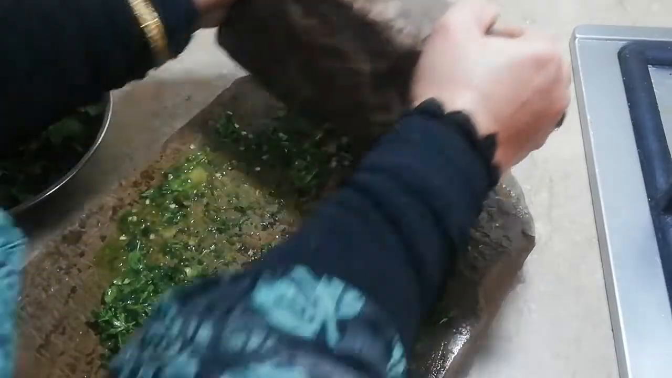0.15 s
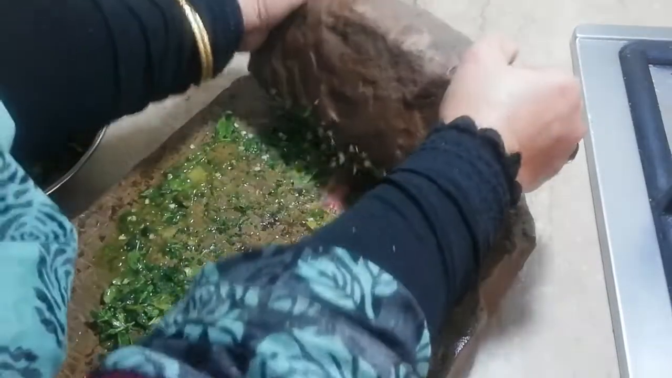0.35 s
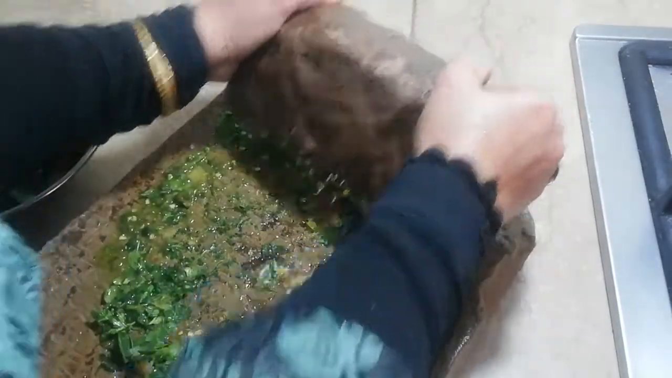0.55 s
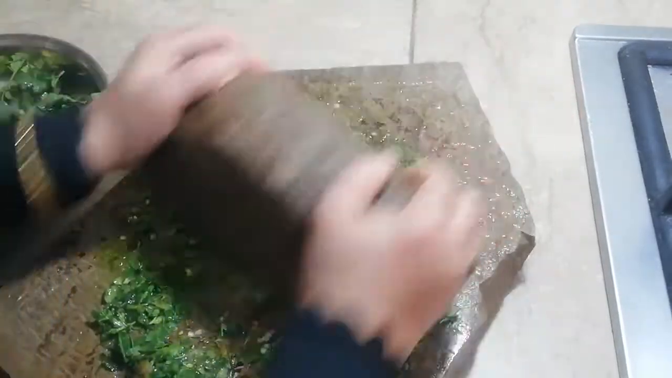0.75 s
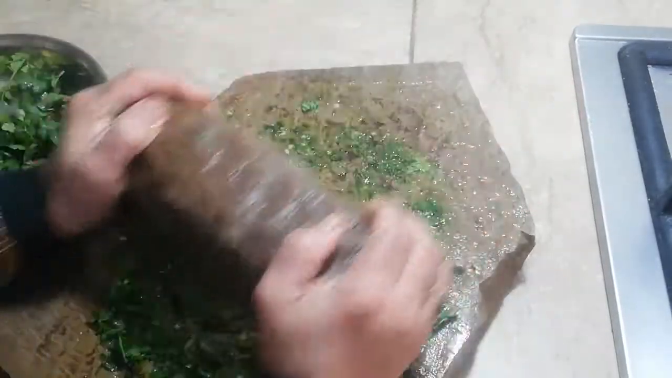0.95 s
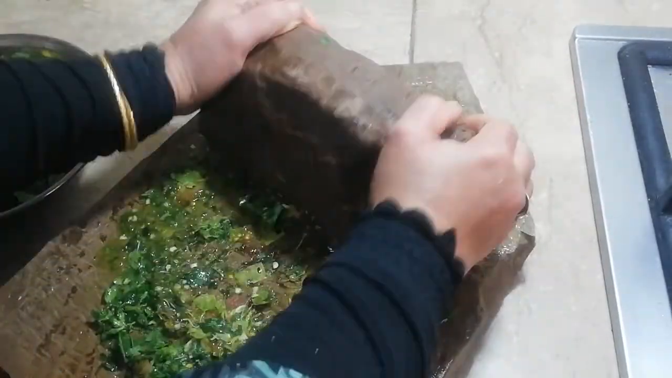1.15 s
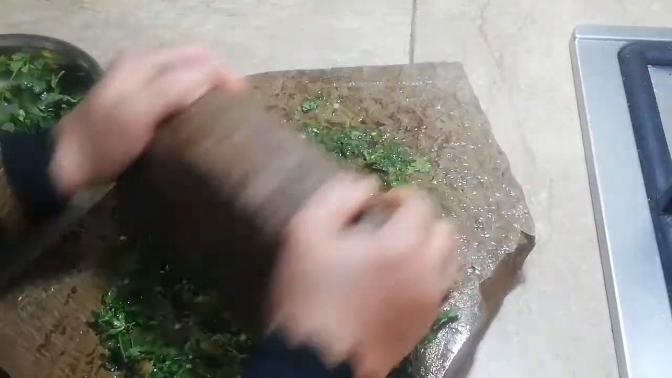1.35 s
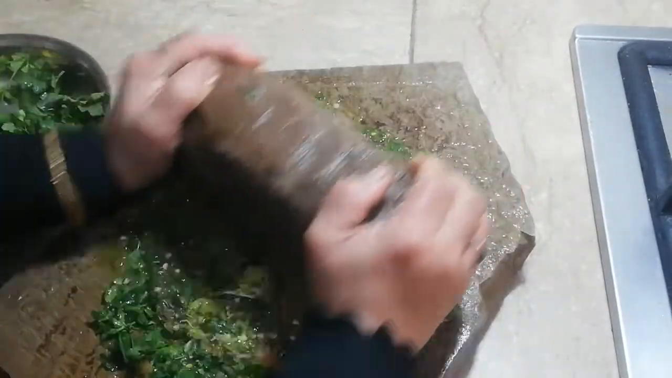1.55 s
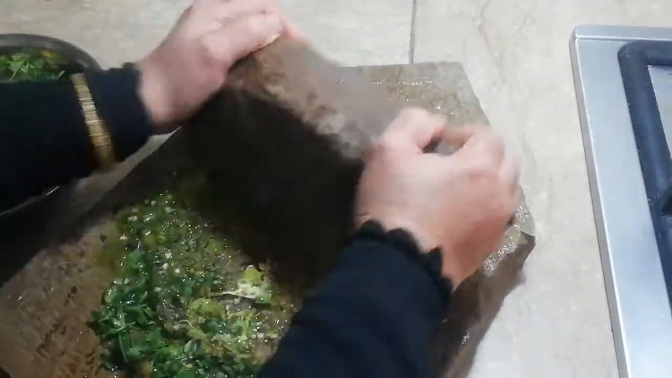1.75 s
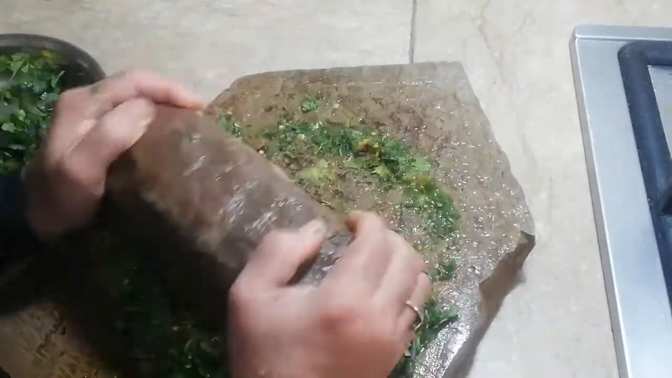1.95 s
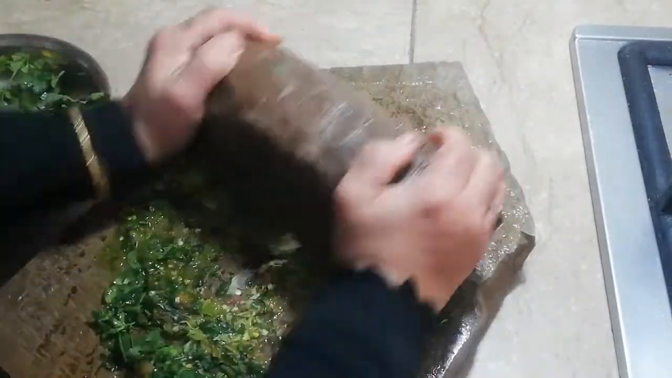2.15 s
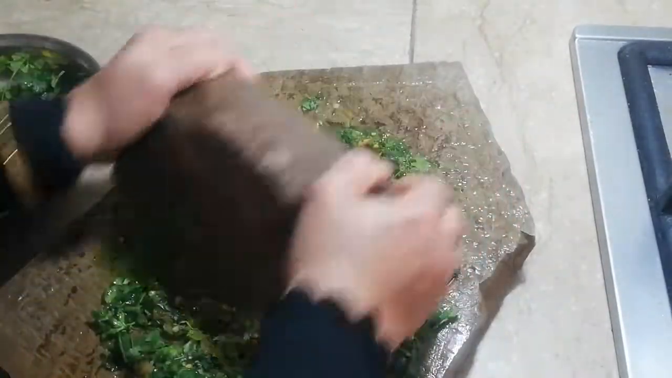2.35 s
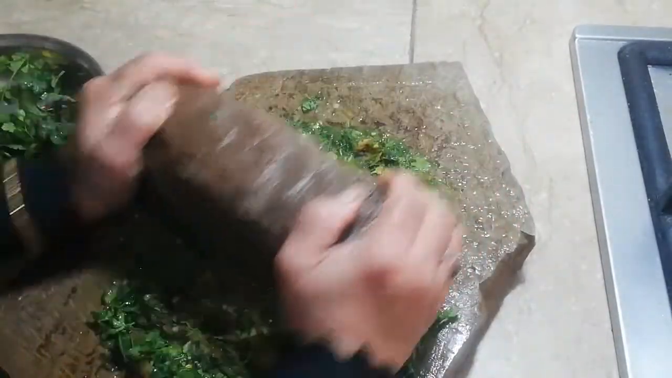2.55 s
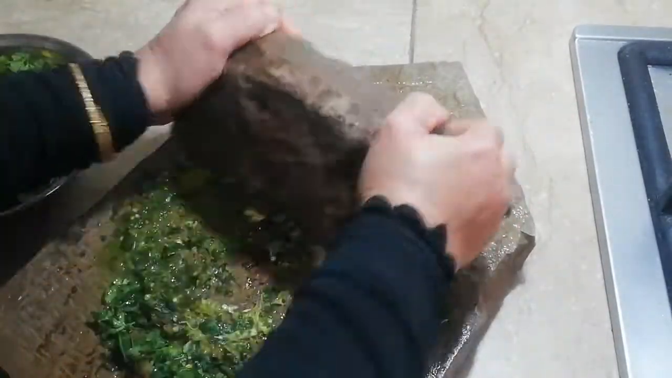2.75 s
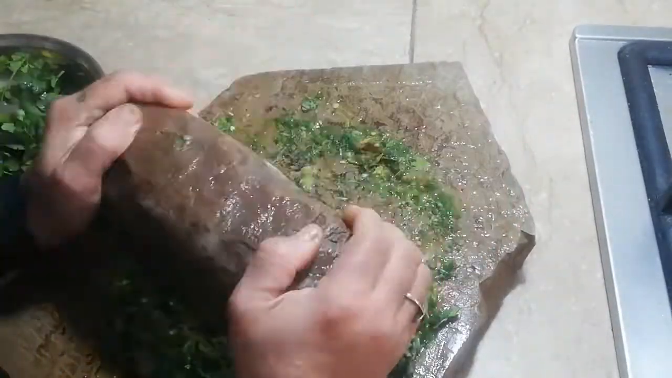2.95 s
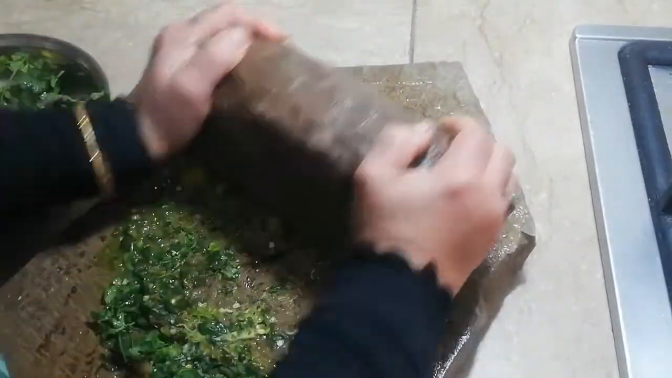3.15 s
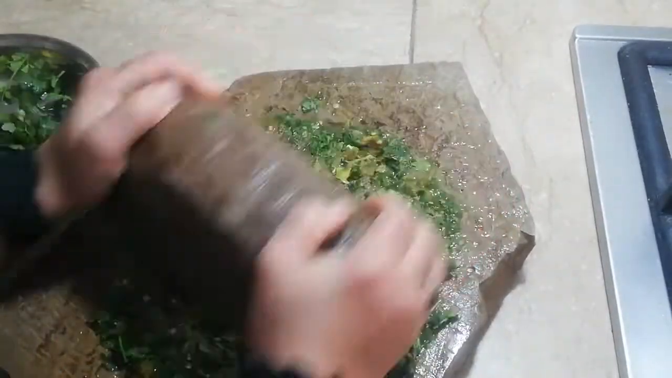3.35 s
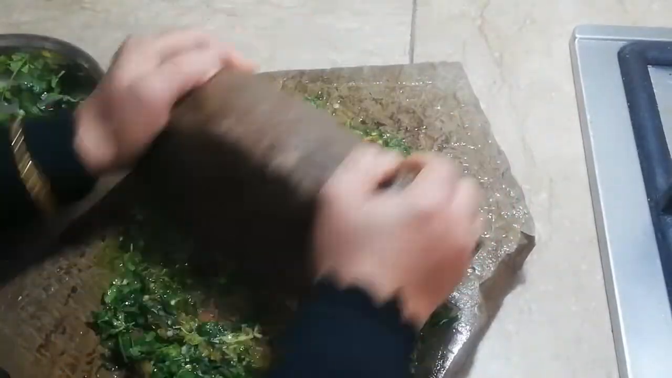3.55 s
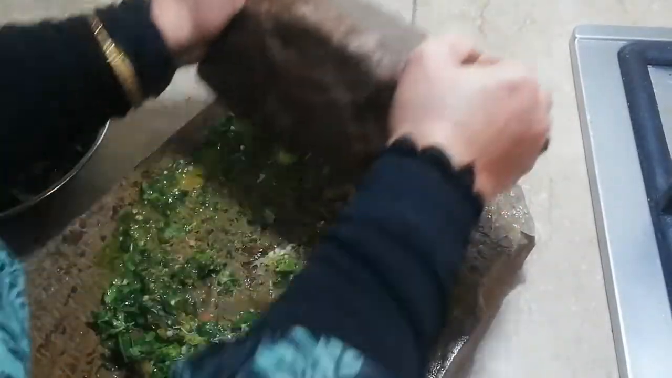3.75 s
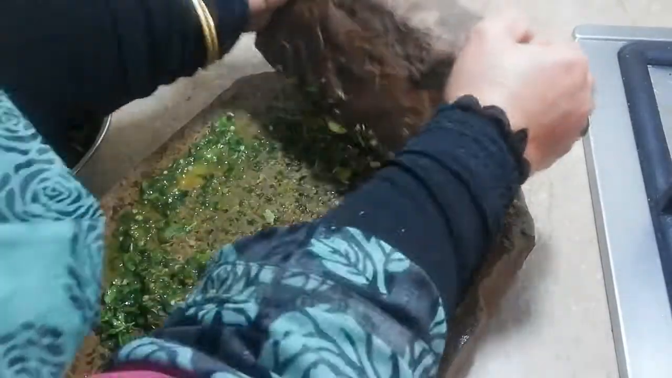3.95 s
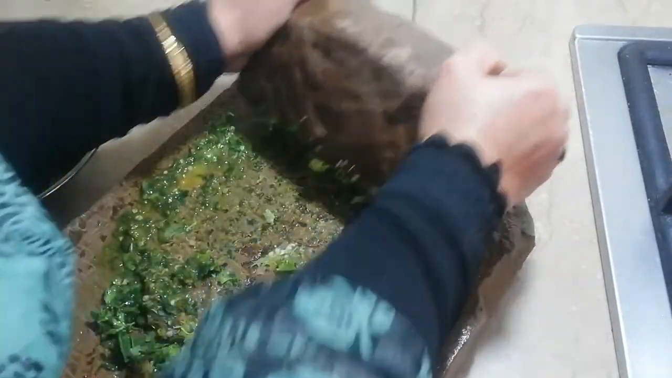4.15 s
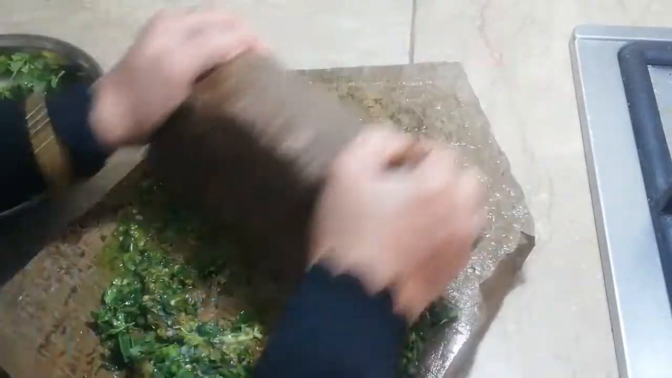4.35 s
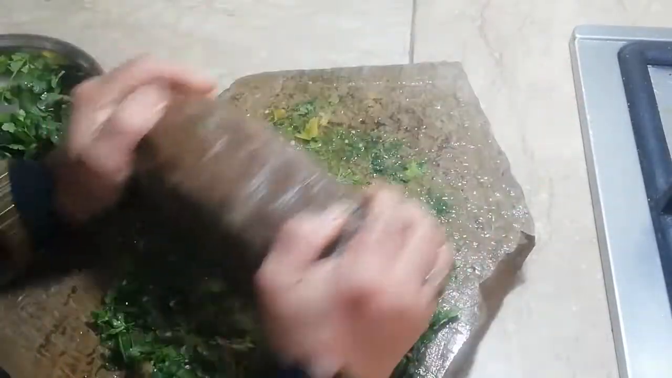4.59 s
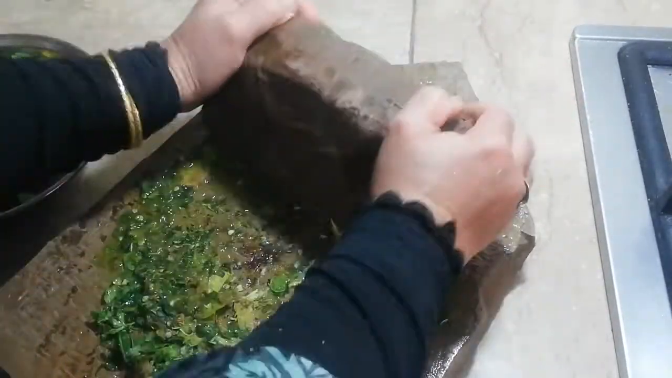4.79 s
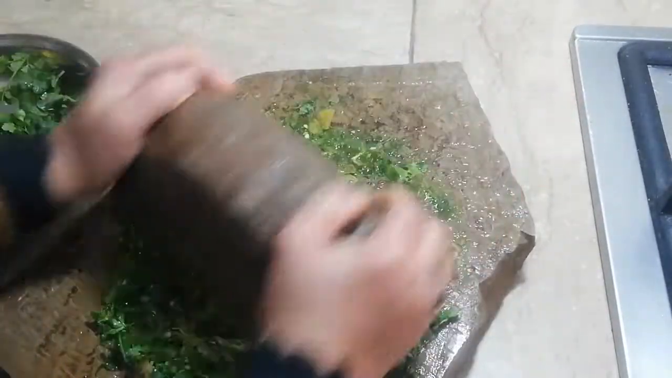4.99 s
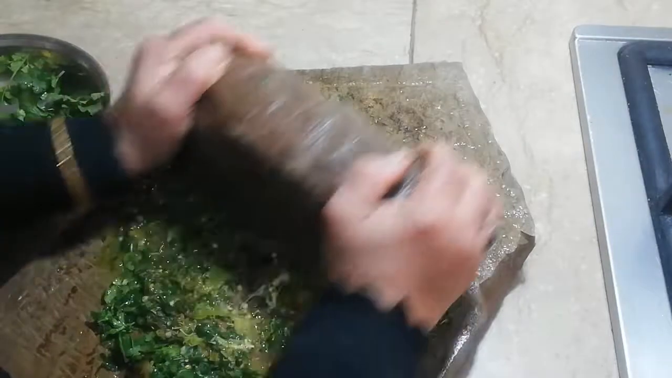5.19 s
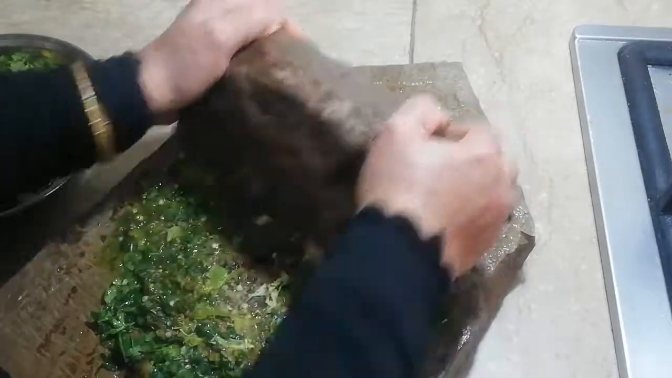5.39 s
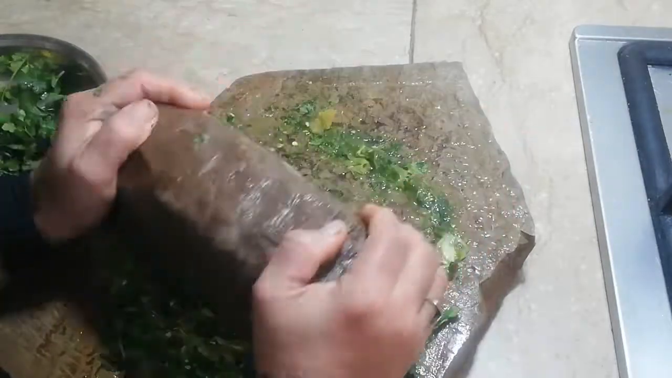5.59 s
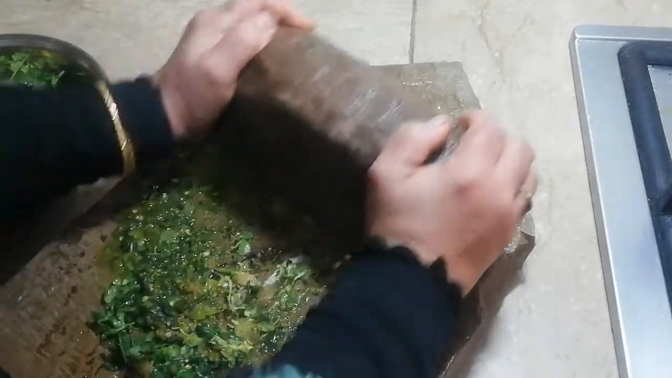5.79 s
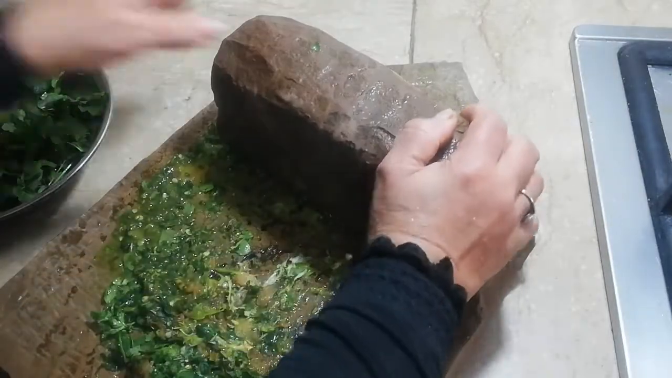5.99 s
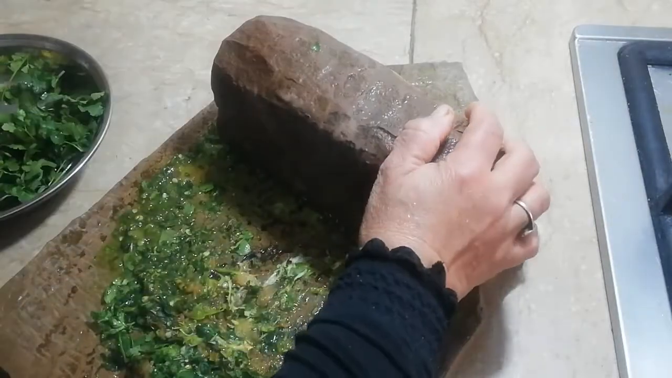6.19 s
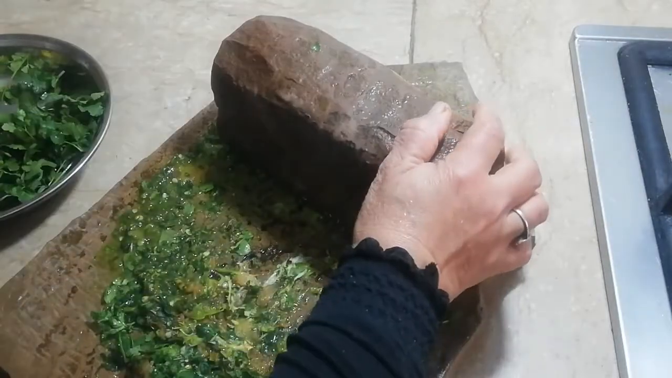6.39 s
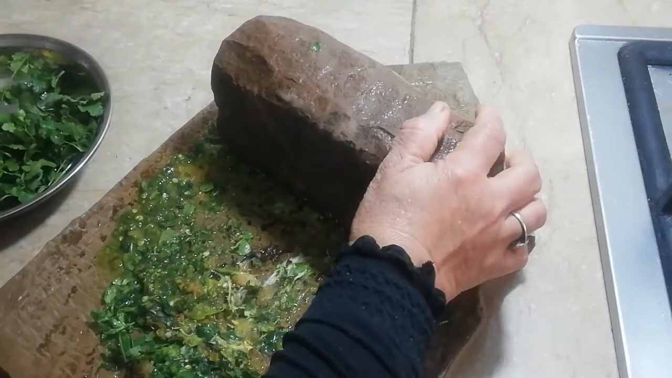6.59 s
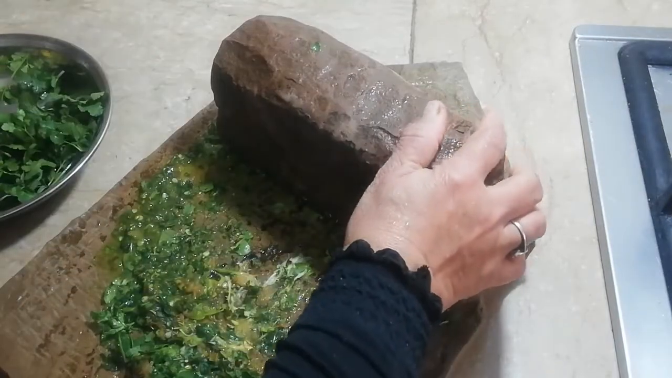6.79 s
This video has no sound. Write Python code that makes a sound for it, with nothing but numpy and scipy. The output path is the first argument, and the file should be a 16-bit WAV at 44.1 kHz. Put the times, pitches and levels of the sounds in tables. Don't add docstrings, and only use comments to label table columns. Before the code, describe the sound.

Rough stone rubs to and fro on a grinding slab, knocking and crushing wet greens, with two hard drops and a faint fridge hum.

```python
import sys
import numpy as np
from scipy import signal
from scipy.fft import rfft, irfft, next_fast_len
from scipy.io import wavfile

SR = 44100
rng = np.random.default_rng(int(sys.argv[2]) if len(sys.argv) > 2 else 0)


def master_out(mix):
    frames = np.transpose(np.atleast_2d(mix))
    ceiling = np.clip(frames, -1, 1)
    pcm = np.round(ceiling * 32767).astype(np.int16)
    wavfile.write(sys.argv[1], SR, pcm)


def makeup_ratio(level_db):
    decades = np.asarray(level_db, float) / 20
    return 10 ** decades


N = 301203
SIZE = next_fast_len(N + SR)
FREQ = np.fft.rfftfreq(SIZE, 1 / SR)
FFT_SIZE = 2 * (len(FREQ) - 1)
TIME = np.arange(N) / SR
STEP = TIME[::64]


def level(x, rms_db):
    return x * makeup_ratio(rms_db) / np.sqrt(np.mean(x ** 2))


def above(x, hz):
    return signal.sosfilt(signal.butter(3, hz, "high", fs=SR, output="sos"), x)


def curve(table):
    hz, db = np.transpose(table)
    return makeup_ratio(np.interp(np.log(FREQ + 1), np.log(hz), db))


def shape(x, response):
    return irfft(rfft(x, FFT_SIZE) * response, FFT_SIZE)[..., :N]


def fade(x, decay_s):
    return signal.lfilter([1], [1, -np.exp(-1 / (decay_s * SR))], x)


def ring(x, hz, width_hz):
    radius = np.exp(-np.pi * width_hz / SR)
    turn = 2 * np.pi * hz / SR
    return signal.lfilter([np.sin(turn)], [1, -2 * radius * np.cos(turn), radius ** 2], x)


def body(x, modes):
    out = 0
    for k, (hz, width_hz, db) in enumerate(modes):
        out = out + (-1) ** k * makeup_ratio(db) * width_hz * ring(x, hz, width_hz)
    return out


def unit(modes):
    return np.abs(body(np.eye(1, 4000)[0], modes)).max()


def signs(count):
    return np.sign(rng.standard_normal((count, N)))


def grit(per_s, scatter_db):
    chance, size = rng.random((2, N))
    click = makeup_ratio(scatter_db * np.minimum(-np.log(1 - size), 3.2))
    return (chance < per_s / SR) * click


def blows(times_s, dbs, push_s):
    force = np.zeros(N)
    force[(np.asarray(times_s) * SR).astype(int)] = makeup_ratio(dbs)
    push = np.hanning(max(int(push_s * SR), 3) + 2)
    return np.convolve(force, push / push.sum())[:N]


def total_db(dbs):
    return 10 * np.log10(np.sum(makeup_ratio(dbs) ** 2, axis=0) + 1e-14)


def smooth(dbs):
    return [np.interp(TIME, STEP, db) for db in dbs]


# [fullest t/s, swell/s, counter rumble/dB, stone chatter/dB, counter sway/dB]
PUSHES = [
    (1.27, 0.011, -22, -33.5, -34),
    (1.87, 0.051, -17.5, -28, -38),
    (2.38, 0.057, -17.5, -30, -36),
    (2.85, 0.061, -19.5, -27.5, -35.5),
    (3.35, 0.027, -18, -24.5, -33),
    (4.915, 0.023, -25, -33, -36),
    (4.98, 0.023, -25.5, -35.5, -30.5),
    (5.44, 0.03, -19, -23, -34),
    (5.52, 0.077, -20, -40, -42),
]
# [fullest t/s, swell/s, counter rumble/dB, stone chatter/dB, counter sway/dB]
PULLS = [(0.01, 0.022, -47.5, -54.5, -49.5), (1.09, 0.029, -30.5, -39, -28), (1.46, 0.069, -51, -65, -40),
         (1.62, 0.064, -32, -38, -31.5), (2.18, 0.14, -34.5, -39, -40), (2.63, .06, -25, -34.5, -32),
         (3.02, 0.024, -28.5, -41, -50), (3.14, 0.091, -28.5, -37, -34.5), (3.61, 0.024, -25, -36, -40),
         (4.05, 0.42, -58.5, -57, -49.5), (4.715, 0.03, -32.5, -42, -42.5), (5.23, 0.038, -31, -36, -33.5),
         (5.31, 0.023, -26, -50, -46), (5.76, 0.046, -29.5, -41.5, -36), (5.84, 0.056, -46.5, -54, -56),
         (6.83, 0.04, -61.5, -49.5, -63)]
# [fullest t/s, swell/s, counter rumble/dB, stone chatter/dB, counter sway/dB]
ROCKING = [
    (0.43, 0.0087, -36, -49, -29),
    (0.54, 0.083, -22.5, -48, -42),
    (0.7, 0.24, -32, -38, -38),
    (4.12, 0.0093, -16, -23, -34),
    (4.31, 0.027, -28, -34, -45),
    (4.45, 0.12, -35, -41, -36.5),
]


def strokes():
    swell_db = 11
    groups = [(PUSHES, (135, 120, 122)), (PULLS, (129.5, 138.5, 124)), (ROCKING, (110, 128.5, 125))]
    out = []
    for table, fall_db_s in groups:
        for s, swell_s, *full_db in table:
            early = np.maximum(s - STEP, 0) / swell_s
            late_s = np.maximum(STEP - s, 0)
            fall_db = np.array(fall_db_s)[:, None] * late_s
            out.append(np.array(full_db)[:, None] - swell_db * early ** 2 - fall_db)
    return smooth(total_db(np.array(out)))


# [t/s, peak level/dB,
# counter share/dB]
KNOCKS = [(0.417, -0.5, -19), (0.444, -12, -6), (0.527, -18, -12), (0.587, -21, -5), (0.688, -25.5, 0.5),
          (1.076, -26, -0.5), (1.265, -31.5, 11), (1.614, -26.5, 2.5), (1.814, -30, 8.5),
          (1.832, -16.5, -2.5), (1.856, -15, -10), (2.329, -24, 0), (2.346, -21, -7), (2.362, -11, -10),
          (2.388, -12.5, -19), (2.489, -22.5, -2.5), (2.172, -34.5, 12), (2.792, -24, -24),
          (2.845, -9.5, -5), (3.316, -31, 3), (3.346, -15, -16), (3.379, -13.5, -7), (3.606, -15.5, -3),
          (4.108, -8.5, -22), (4.137, -20, -4), (4.192, -19.5, 0), (4.986, -27, 5.5), (5.423, -23, 1),
          (5.468, -7.5, -6.5), (5.706, -29.5, 3)]
# [f/Hz, width/Hz, level/dB]
COUNTER = [(137, 24, -6.5), (167.7, 21, -1), (261.3, 21.7, -4), (298, 33, -3), (318.5, 42.6, -4.5),
           (376, 15.6, -9.5), (439.8, 32, -14), (600, 190, -20.5)]
# [f/Hz, width/Hz, level/dB]
SWAY = [(80, 4.9, -25.5), (107, 12, -1)]
# [f/Hz, width/Hz, level/dB]
SLAB = [(570, 75, -2.5), (650, 73, 2), (759, 130, -0.5), (853, 103, 5.5), (993, 44, 4), (1109, 140, 2.5),
        (1295, 114, 2), (1420, 110, -3), (1534, 340, -8), (1680, 270, -8), (2060, 55, 0.5),
        (2600, 100, -28), (3260, 370, -14.5)]


def stone(rumble_db, chatter_db, sway_db):
    bump_sign, chatter_sign, rattle_sign = signs(3)
    bumps = bump_sign * grit(420, 1.75)
    rumble = level(body(bumps, COUNTER), 0) * makeup_ratio(rumble_db - 4.5)
    sway = level(body(bumps, SWAY), 0) * makeup_ratio(sway_db)
    chatter = level(body(chatter_sign * grit(520, 1.5), SLAB), 0) * makeup_ratio(chatter_db - 8.5)
    s, db, share_db = np.transpose(KNOCKS)
    rattle = fade(blows(s + 0.0017, db - 14, 0.0001), 0.0068) * rattle_sign * grit(350, 6)
    rattle = fade(rattle, 0.00005) / 2.7
    knocks = body(blows(s, db - 0.5, 0.00052) + rattle, SLAB) / unit(SLAB)
    both = COUNTER + SWAY
    thuds = body(blows(s, db + share_db, 0.0008), both) / unit(both)
    return above(above(rumble + sway + thuds, 70), 80), chatter + knocks


# [t/s, peak level/dB]
DROPS = [
    (0.414, -6),
    (4.107, -8.5),
]
# [f/Hz, level/dB, decay scale/s; each mode falls 60 dB in about 0.27 of it]
DROP_RING = [(754.6, -8, 0.19), (892, 1.5, 0.13), (960, 1, 0.058), (1072, 5.5, 0.074), (1090, -12, 0.097),
             (1174, -23.5, 0.1), (1430, 7, .07), (1720, -18.5, 0.074)]
# [f/Hz, width/Hz, level/dB]
STEEL = [(2925, 9, 6), (3300, 40, -7.5), (4062, 14, 7), (4130, 16, 4), (4600, 29, -14), (6600, 44, -5.5),
         (7240, 25, -11.5), (8200, 27, -10), (8830, 41, -0.5), (9442, 28, -9.5), (10800, 25, -13),
         (11500, 25, -13), (12400, 35, -23), (6000, 5200, 12)]


def drops():
    s, db = np.transpose(DROPS)
    hit = 0.35 * blows(s + 0.0016, db, 0.0006)
    hit = hit + blows(s + 0.0032, db + 2, 0.0007) + 0.2 * blows(s + 0.0072, db, 0.0007)
    crack = makeup_ratio(5) * ring(hit, 980, 150) + makeup_ratio(7) * ring(hit, 1250, 200) + makeup_ratio(1.5) * ring(hit, 1700, 400)
    thump = makeup_ratio(-10.5) * body(blows(s + 0.00039, db, 0.00084), COUNTER) / unit(COUNTER)
    dense = grit(1500, 1.3) * signs(1)[0]
    rattle = fade(blows(s + 0.0058, db, 0.002), 0.059) * dense
    rattle = fade(fade(rattle, 0.00006), 0.00006) / 7
    slab = sum(makeup_ratio(g - 30) * ring(rattle, hz, 8.1 / t60_s) for hz, g, t60_s in DROP_RING)
    loose = fade(blows(s + 0.0033, db, 0.003), 0.11) * dense
    loose = fade(fade(loose, 0.00004), 0.00005) / 2
    scatter = makeup_ratio(-28.5) * ring(loose, 1438, 1000) + makeup_ratio(-24.5) * ring(loose, 2800, 1400)
    jolt = fade(blows(s + 0.005, db, 0.012), 0.04) * dense
    jolt = fade(jolt, 0.00002) / 1.3
    steel = sum(makeup_ratio(g - 44) * ring(jolt, hz, width_hz) for hz, width_hz, g in STEEL)
    return above(thump, 75), slab + crack + scatter, steel


# [start t/s, length/s, wet shearing/dB, film hiss relative/dB]
SMEARS = [(0.0, .02, -63, -4), (0.53, .26, -54.5, -4), (0.802, 0.22, -47, -0.5), (1.048, 0.05, -40.5, -1),
          (1.12, 0.032, -43, -9), (1.263, 0.13, -45.5, -6), (1.436, 0.028, -39.5, -4),
          (1.536, 0.17, -40.5, -5.5), (1.781, 0.2, -45, -6), (1.996, 0.019, -36.5, -6),
          (2.083, 0.13, -39, -4.5), (2.278, .17, -46, -7), (2.494, 0.22, -35.5, -6.5),
          (2.78, 0.19, -50, -4.5), (2.945, 0.25, -37, -6.5), (3.297, 0.15, -40.5, -9.5),
          (3.418, 0.2, -40, -5), (3.846, 0.18, -59.5, -10), (4.203, 0.072, -56, -7), (4.287, 0.19, -51, -4),
          (4.487, .06, -43.5, -3), (4.598, 0.2, -41, -5), (4.899, 0.14, -44, -8.5),
          (5.074, 0.022, -37, -2.5), (5.186, 0.11, -39, -6), (5.43, 0.18, -47.5, -4.5),
          (5.595, 0.055, -40.5, -8), (5.696, 0.14, -38.5, -6), (5.98, 0.04, -60.5, -3),
          (6.808, 0.044, -65, -11)]


def smears():
    rise_db_s, sag_db_s, fall_db_s = 800, 15, 228.5
    s, length_s, db, film_db = np.transpose(SMEARS)[:, :, None]
    into_s = STEP - s
    wet_db = db - rise_db_s * np.maximum(-into_s, 0) - sag_db_s * np.maximum(into_s, 0)
    wet_db = wet_db - fall_db_s * np.maximum(into_s - length_s, 0)
    wet_total_db = total_db(wet_db)
    return smooth([wet_total_db, total_db(wet_db + film_db) - wet_total_db])


# [f/Hz, level/dB per Hz]
PASTE = [(760, -18), (1300, -2), (1570, -6.5), (2600, -1.5), (2770, -2.5), (3350, -0.5), (4580, -2.5),
         (9170, -4), (14400, -19.5), (16000, -41)]


def paste(wet_db, film_db):
    common = fade(grit(120, 7.5), 0.02)
    common = common / common.mean()
    colour = curve(PASTE)
    coarse, fine = 0, 0
    for hz in 1400 * 2 ** np.arange(0, 3.6, 0.5):
        own = fade(grit(200, 8.4), 0.0074)
        tick = fade(grit(45, 4.7), 0.00028)
        gate = 0.5 + 0.5 * common + 0.6 * own / own.mean() + 0.09 * tick / tick.mean()
        shared, left, right = rng.standard_normal((3, N))
        hiss = gate * (0.17 * shared + np.array([left, right]))
        octaves = np.log2(FREQ / hz + 1e-9)
        part = rfft(hiss, FFT_SIZE) * np.exp(-0.5 * (octaves / 0.3) ** 2) * colour
        if hz < 6000:
            coarse = coarse + part
        else:
            fine = fine + part
    coarse, fine = irfft(coarse, FFT_SIZE)[:, :N], irfft(fine, FFT_SIZE)[:, :N]
    rms = np.sqrt(np.mean((coarse + fine) ** 2))
    return (coarse + fine * makeup_ratio(film_db + 5)) * makeup_ratio(wet_db + 1) / rms


# [t/s, peak level/dB, centre f/Hz, left minus right/dB]
POPS = [(0.802, -31.5, 3400, 2), (0.8702, -22.5, 4630, -5), (0.9195, -33, 2900, -18),
        (0.9684, -23, 3900, -3.5), (1.0242, -17.5, 7970, 6.5), (1.249, -37.5, 3260, -1),
        (1.4419, -19, 4300, 2), (1.5587, -20, 5950, 2), (1.63, -18.5, 4700, -5), (2.1016, -26, 9300, 5.5),
        (2.49, -15, 5400, -15.5), (2.6068, -22.5, 4800, -6), (2.9466, -14, 7500, 12),
        (3.021, -31.5, 3650, -30), (3.1194, -24, 3360, 5), (3.286, -30, 5880, 11),
        (3.4279, -23.5, 4970, 14), (3.546, -28, 6560, -3), (4.4985, -27.5, 6500, 14),
        (4.5938, -24.5, 9000, -2), (4.6505, -22, 5100, 3), (4.7783, -32.5, 4470, 19),
        (1.147, -29.5, 2250, -7), (5.0888, -17.5, 6500, 22), (5.2065, -19, 3620, 4), (5.589, -30, 5230, 2),
        (5.6192, -22, 8600, 14), (5.7368, -30, 4400, 17), (5.9896, -46, 3070, 0), (6.56, -56, 7950, -2)]


def pops():
    decay_s, splash, length = 0.012, 0.4, 2000
    t = np.arange(length) / SR
    envelope = np.minimum(t / (0.14 * decay_s), 1) * makeup_ratio(-60 * t / (3 * decay_s))
    out = np.zeros((2, N))
    for s, db, hz, pan_db in POPS:
        noise = rng.standard_normal((2, length))
        puff = (noise + 0.34 * noise[::-1]) * envelope
        pop = above(ring(puff, hz, 0.24 * hz) + splash * ring(puff, 7500, 5400), 1950)
        pop = pop / np.abs(pop).max()
        at = int(s * SR)
        gain = makeup_ratio(db + np.array([[0.4], [-0.4]]) * pan_db)
        out[:, at:at + length] += gain * pop[:, :N - at]
    return out


# [f/Hz, left minus right/dB]
PORT_TILT = [(300, 0.36), (700, -4), (1290, -5.5), (2380, -3.5), (4400, 2.5), (8120, -8.5), (15000, -10)]


def ports(x, lag_s, turn_hz, width_hz):
    tilt = np.sqrt(curve(PORT_TILT))
    swing = (turn_hz ** 2 - FREQ ** 2) - 1j * FREQ * width_hz
    late = np.exp(-2j * np.pi * FREQ * lag_s)
    return shape(x * np.ones((2, 1)), np.array([tilt * swing / np.conj(swing), late / tilt]))


def room(x, t60_s, shared_hz):
    t = np.arange(SR // 2) / SR
    noise = rng.standard_normal((2, len(t))) * np.minimum(t / 0.0075, 1)
    dark = 1 / (1 + (FREQ / 3500) ** 2)
    slow = rfft(noise * makeup_ratio(-60 * t / t60_s), FFT_SIZE) * dark
    fast = rfft(noise * makeup_ratio(-60 * t / (0.5 * t60_s)), FFT_SIZE) * (1 - dark)
    tail = slow + fast
    mid, side = tail / np.sqrt(np.mean(np.abs(tail) ** 2))
    side = side / np.sqrt(1 + (shared_hz / (FREQ + 1)) ** 4)
    return shape(x, np.array([mid + side, mid - side]))


# [f/Hz, level/dB per Hz]
KITCHEN = [(20, -1), (40, -7), (100, -8), (250, -14.5), (450, -22.5), (520, -26), (1000, -23.5),
           (3000, -28.5), (9500, -32.5), (12000, -36.5), (16000, -37)]
# [f/Hz, rms level/dB]
HUM = [(64.6, -73), (102.3, -72), (301.5, -80), (344.5, -81), (393.0, -79), (441.4, -74), (936.7, -89),
       (1825, -83), (2681, -90), (3014, -89)]


def kitchen():
    mid, side = shape(rng.standard_normal((2, N)), curve(KITCHEN))
    side = shape(side, 1 / np.sqrt(1 + (450 / (FREQ + 1)) ** 2))
    waver = fade(rng.standard_normal((len(HUM), N)), 0.15) / np.sqrt(0.075 * SR)
    hum = 0
    for (hz, db), w in zip(HUM, waver):
        hum = hum + np.sqrt(2) * makeup_ratio(db + 2.5 + 1.2 * w) * np.sin(2 * np.pi * hz * TIME)
    return level(np.array([mid + side, mid - side]), -58.5) + hum


def scene():
    counter, slab = stone(*strokes())
    thump, clack, steel = drops()
    wet = paste(*smears()) + pops()
    low = counter + thump
    stones = above(slab + clack, 450) + steel
    direct = ports(low + stones + wet, lag_s=0.00013, turn_hz=557, width_hz=240)
    air = makeup_ratio(-13) * low + makeup_ratio(-10.5) * stones + makeup_ratio(-7.5) * wet.mean(axis=0)
    return direct + room(above(air, 46), t60_s=0.4, shared_hz=290) + kitchen()


def band_limit(x):
    return signal.sosfilt(signal.butter(12, 16510, fs=SR, output="sos"), x)


def record(dry):
    ceiling, top_hz = 1.25, 15600
    drooped = shape(dry, 0.43 + 0.51 / np.sqrt(1 + (FREQ / 10600) ** 12))
    rounded = ceiling * np.tanh(makeup_ratio(-1.5) * drooped / ceiling)
    low_pass = signal.ellip(8, 0.2, 70, top_hz, fs=SR, output="sos")
    mix = signal.sosfilt(low_pass, rounded)
    return band_limit(mix)


dry = scene()
out = record(dry)
master_out(out)
```